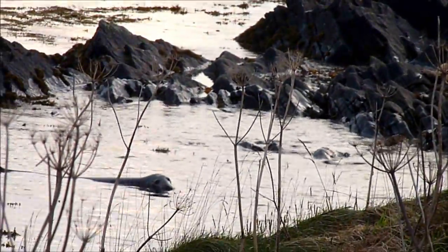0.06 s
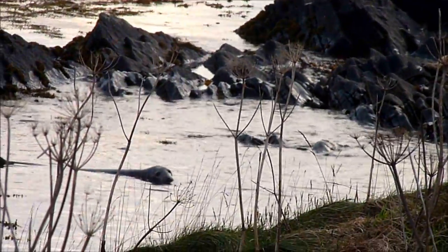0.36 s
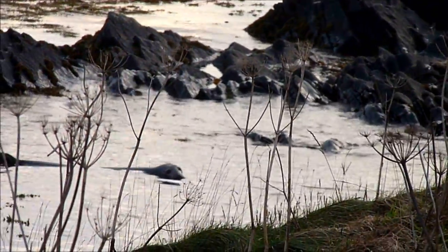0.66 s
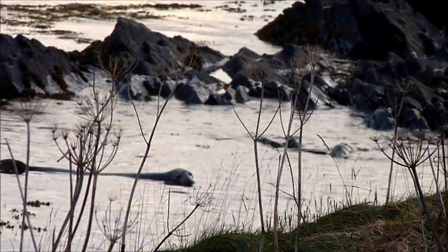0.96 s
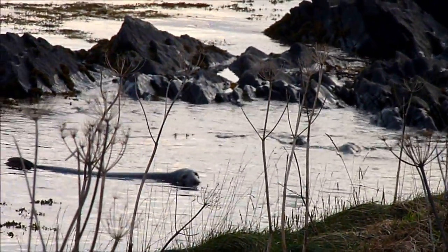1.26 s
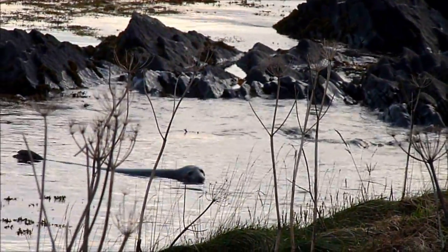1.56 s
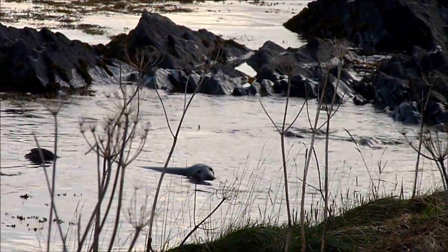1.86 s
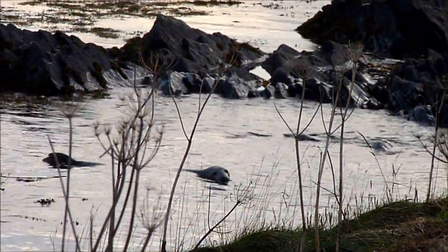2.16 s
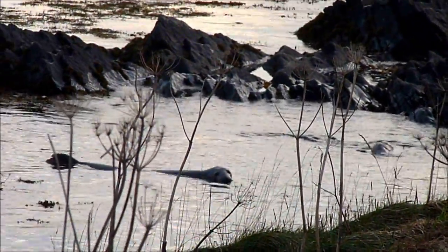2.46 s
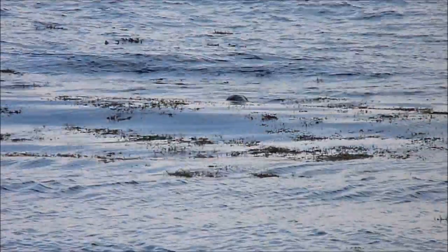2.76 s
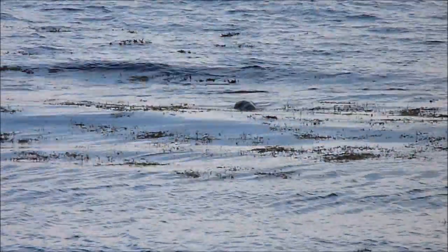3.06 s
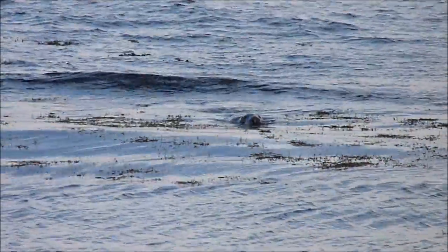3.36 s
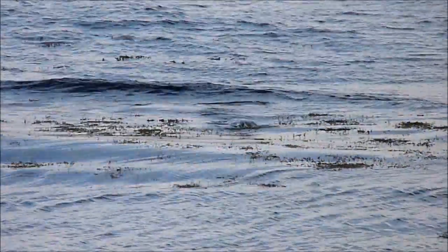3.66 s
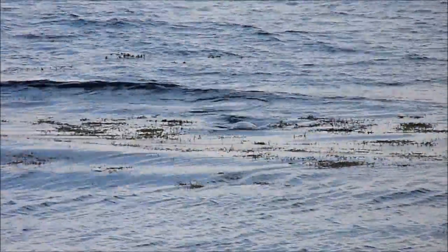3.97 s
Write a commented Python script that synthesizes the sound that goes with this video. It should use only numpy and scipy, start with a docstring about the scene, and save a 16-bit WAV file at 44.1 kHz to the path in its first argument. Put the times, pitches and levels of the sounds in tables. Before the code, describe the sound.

A wading bird whistles rising notes on a calm shore, after a wash of water and wind.

```python
"""A wading bird at a rocky sea inlet

First, water and wind make a steady wash, and a few gusts bump the microphone. After a sudden cut
the shore is calmer: wind rumbles over a distant drone, and a wading bird, probably a curlew, gives
rising whistles that jump up into a higher voice. The recorder hisses faintly."""
import sys
import numpy as np
from scipy import signal
from scipy.fft import rfft, irfft
from scipy.io import wavfile
from scipy.ndimage import uniform_filter1d

SR = 44100
rng = np.random.default_rng(int(sys.argv[2]) if len(sys.argv) > 2 else 0)


def pcm_store(signal):
    """Save signal as 16-bit PCM."""
    levels = np.round(np.clip(np.atleast_2d(signal), -1, 1) * 32767)
    wavfile.write(sys.argv[1], SR, levels.astype(np.int16).T)


N = 176400
T = np.arange(N) / SR
FREQS = np.maximum(np.arange(N // 2 + 1) * SR / N, 1)  # the frequencies in a spectrum, in Hz
CUT_S = 2.678  # when the wash gives way to the calm shore


def gain(db):
    """Turn decibels into a number to multiply a sound by."""
    return 10 ** (np.asarray(db) / 20)


def normalise(x):
    """Scale a sound so its average strength (rms) is 1."""
    return x / np.sqrt(np.mean(x ** 2))


def wander(per_second):
    """A smooth random curve that strays about 1 either side of zero."""
    hold = int(SR / per_second)
    steps = np.repeat(rng.standard_normal(N // hold + 1), hold)
    return 1.27 * uniform_filter1d(uniform_filter1d(steps, hold), hold)[:N]


def noise(shape):
    """Noise of strength 1; shape says how much of each frequency it holds."""
    return normalise(irfft(rfft(rng.standard_normal(N)) * shape, N))


def colour(points):
    """Join (Hz, dB) points into a noise shape that falls away above the last one."""
    hz, db = np.array(points, float).T
    roll_off = np.minimum(hz[-1] / FREQS, 1) ** 2
    return gain(np.interp(np.log(FREQS), np.log(hz), db)) * roll_off


def flickering_noise(points, flicker_db, bands=10):
    """Noise whose octave bands grow louder and softer, partly together."""
    spectrum = rfft(noise(colour(points)))
    shared = wander(per_second=12)
    octave = np.clip(np.log2(FREQS / 20), 0, bands - 1)
    total = np.zeros(N)
    for k in range(bands):
        band = irfft(spectrum * np.maximum(1 - abs(octave - k), 0), N)
        total += band * gain(flicker_db * (wander(per_second=24) + shared / 2))
    return normalise(total)


def burst(peak_s, half_s, shape):
    """A puff of noise that swells to strength 1 and dies away."""
    swell = np.exp(-((T - peak_s) / half_s) ** 2 / 2)
    puff = noise(shape) * swell
    return puff * np.sqrt(np.sum(swell ** 2) / np.sum(puff ** 2))


def low_pass(x, hz):
    """Sharply remove the sound above hz."""
    return signal.sosfilt(signal.ellip(8, .2, 70, hz, fs=SR, output="sos"), x)


def calm_water():
    """Soft, far water that flickers a little."""
    # The water's tone. Each row: frequency in Hz, relative level in dB.
    tone = [(30, -4.5), (120, -1.5), (250, -4.5), (420, -8.5), (750, -16), (1200, -20), (2000, -28.5),
            (3200, -34.5), (5000, -48)]
    return gain(-47.5) * flickering_noise(tone, flicker_db=1.5)


def distant_drone(waver_db=1.5, fade_db_per_s=2):
    """A hum of narrow noise bands that wavers and slowly fades, perhaps a distant boat."""
    # The drone's resonances. Each row: centre in Hz, width in Hz, average level at the cut in dB.
    resonances = [(517, 38, -54), (578, 62, -50.5), (620, 45, -61)]
    hum = np.zeros(N)
    for hz, width, db in resonances:
        hum += gain(db) * noise(1 / (1 + 2 * ((FREQS - hz) / width) ** 2) ** 2)
    return hum * gain(waver_db * wander(per_second=28) - fade_db_per_s * (T - CUT_S))


def wash(boost_db=1.5):
    """Water and wind rushing steadily among the rocks."""
    # The wash's tone. Each row: frequency in Hz, relative level in dB.
    tone = [(30, -15.5), (60, -12), (120, -7), (200, -5.5), (280, -2), (400, -3.5), (550, -1), (880, -8),
            (1440, -11), (2470, -22), (3790, -35.5), (5000, -49.5)]
    # Its slow rise and fall. Each row: time in seconds, level in dB before the boost.
    loudness = [(0.2, -41), (0.21, -41), (1.67, -38), (2.07, -40), (2.65, -41), (2.66, -42)]
    times, db = np.array(loudness).T
    return flickering_noise(tone, flicker_db=0.67) * gain(np.interp(T, times, db) + boost_db)


def wind_rumble():
    """Wind on the microphone makes an uneven rumble, louder after the cut."""
    # The rumble's tone. Each row: frequency in Hz, relative level in dB.
    tone = [(15, -12.5), (42, 0), (65, -4), (100, -3.5), (170, -14.5), (280, -22), (600, -46)]
    swell_db = 4 * np.tanh(wander(per_second=35))
    level_db = np.where(T > CUT_S, -43.5, -50.5)
    return noise(colour(tone)) * gain(level_db + swell_db)


def wind_gusts(top_hz=249):
    """Short gusts shake the microphone, each making a low thump."""
    # Each row: peak time in seconds, half length in seconds, centre in Hz, spread in octaves,
    # peak level in dB.
    gusts = [(.882, 0.0053, 110, 0.78, -27), (0.889, .022, 135, 0.5, -35.5), (1.329, .007, 70, .9, -31),
             (1.34, .007, 135, 0.76, -30), (1.367, .007, 110, .9, -36), (2.045, .005, 80, 1.2, -27),
             (2.7, .016, 57, 0.64, -32), (2.771, 0.014, 130, 1.1, -37.5), (2.843, 0.02, 91, .7, -30.5),
             (2.965, .02, 45, 0.59, -37.5), (3.065, 0.021, 165, 0.34, -40.5), (3.787, .026, 90, .8, -29.5),
             (3.839, 0.036, 110, 1, -36)]
    bass_only = 1 / (1 + (FREQS / top_hz) ** 8)
    thumps = np.zeros(N)
    for peak_s, half_s, hz, spread, db in gusts:
        band = np.exp(-(np.log2(FREQS / hz) / spread / 2) ** 2)
        thumps += gain(db) * burst(peak_s, half_s, bass_only * band)
    return thumps


def rasp(peak_s, half_s, hz, db, width_hz=100, spacing_hz=460, side_db=-6.5):
    """A whistle that has not settled: a band of noise with a weaker one on each side."""
    below, middle, above = (np.exp(-((FREQS - centre) / width_hz) ** 2)
                            for centre in (hz - spacing_hz, hz, hz + spacing_hz))
    return gain(db) * burst(peak_s, half_s, middle + gain(side_db) * (below + above))


def whistle(note, fade_s=.005, pitch_jitter=.002, flutter_db=0.85):
    """A nearly pure tone that glides from point to point with a slight tremble."""
    times, hz, db = np.array(note, float).T
    pitch = np.interp(T, times, hz) * (1 + pitch_jitter * wander(per_second=150))
    level = gain(np.interp(T, times, db) + flutter_db * wander(per_second=90))
    ramp = np.clip(np.minimum(T - times[0], times[-1] - T) / fade_s + .5, 0, 1)
    fade = np.sin(np.pi / 2 * ramp) ** 2
    return np.sqrt(2) * level * fade * np.sin(2 * np.pi * np.cumsum(pitch) / SR)


def bird(trim_db=-0.5, echo_db=-24.5, echo_s=0.56):
    """The bird whistles low and high with a little rasp, and the shore echoes it faintly."""
    # Whistles in the low and the high voice, one list for each note.
    # Each point: time in seconds, pitch in Hz, level in dB before the trim.
    low_notes = [
        [(3.007, 1513, -42.5), (3.035, 1539, -39.5), (3.1, 1628, -43), (3.175, 1790, -46.5), (3.198, 1783, -44),
         (3.208, 1920, -38)],
        [(3.434, 1510, -45.5), (3.449, 1567, -46.5), (3.464, 1590, -57)],
        [(3.595, 1630, -62), (3.63, 1694, -51.5), (3.647, 1760, -40.5), (3.658, 1832, -55)],
    ]
    high_notes = [
        [(2.7, 1750, -60), (2.73, 1860, -62), (2.76, 1860, -63.5), (2.795, 1780, -61)],
        [(3.207, 2360, -47.5), (3.226, 2330, -50.5), (3.292, 2470, -47.5), (3.312, 2570, -52.5),
         (3.324, 2460, -54.5)],
        [(3.462, 2130, -64), (3.505, 2105, -64), (3.55, 2060, -65.5), (3.635, 2280, -53), (3.664, 2400, -45),
         (3.695, 2520, -59.5), (3.738, 2550, -63), (3.755, 2460, -58), (3.767, 2320, -56)],
    ]
    # Rough starts and ends of notes.
    # Each row: peak time in seconds, half length in seconds, pitch in Hz, peak level in dB.
    rasps = [(3.001, 0.0074, 1540, -55.5), (3.435, .014, 1830, -63), (3.49, .025, 1790, -65),
             (3.597, .02, 1630, -60)]
    voice = gain(trim_db) * sum(whistle(note) for note in low_notes + high_notes)
    voice += sum(rasp(*row) for row in rasps)
    tail = rng.standard_normal(N) * np.exp(-np.log(1000) * T / echo_s)  # falls 60 dB in echo_s
    echo = signal.fftconvolve(voice, tail / np.sqrt(np.sum(tail ** 2)))[:N]
    return voice + gain(echo_db) * echo


def scene():
    """First the wash, then the calm shore with the bird; wind blows through both."""
    background = np.where(T > CUT_S, calm_water() + distant_drone(), wash())
    return (background + wind_rumble() + wind_gusts() + bird())[None]


def record(dry, start_s=0.1793, gap_s=.007, fade_in_s=0.0023):
    """The recorder adds hiss and a thin whine and dulls the treble; the sound stops briefly where the scene
    changes, then fades back in."""
    # The hiss's tone. Each row: frequency in Hz, relative level in dB.
    hiss_tone = [(100, -1), (3000, -1), (5000, 3), (7500, 1.5), (9000, -24)]
    hiss = gain(-66.5) * noise(colour(hiss_tone))
    whine = gain(-80) * np.sqrt(2) * np.sin(2 * np.pi * 6667 * T)
    offset = -.0096  # a steady shift from zero, which ticks when the sound starts or stops
    dulled = low_pass((dry + hiss + whine + offset) * (T > start_s), hz=7850)
    pause = np.where(T < CUT_S, 1, np.clip((T - CUT_S - gap_s) / fade_in_s, 0, 1))
    return low_pass(dulled * pause, hz=15500)


dry = scene()
out = record(dry)
pcm_store(out)
```